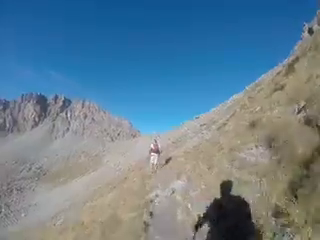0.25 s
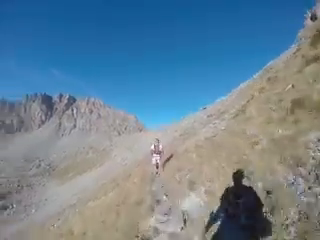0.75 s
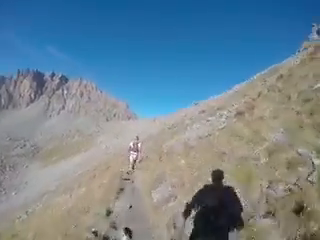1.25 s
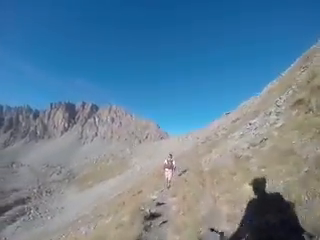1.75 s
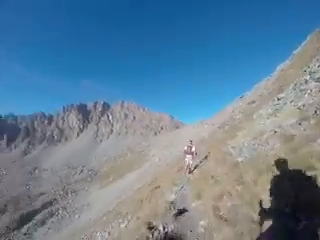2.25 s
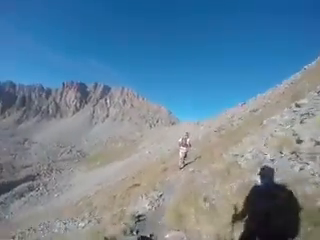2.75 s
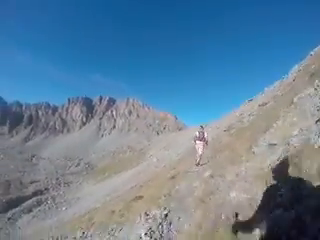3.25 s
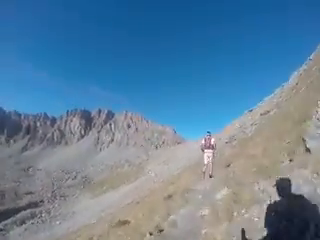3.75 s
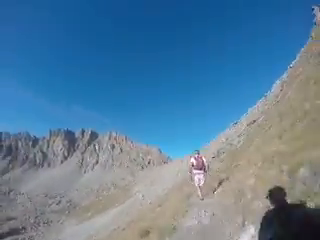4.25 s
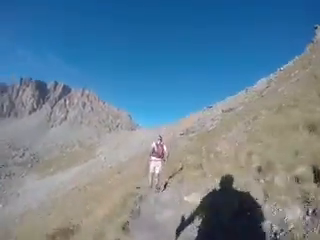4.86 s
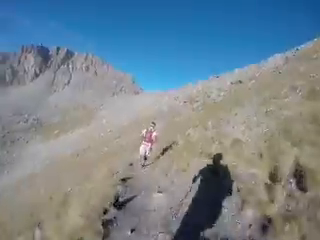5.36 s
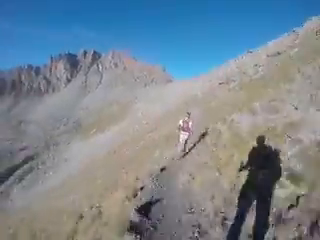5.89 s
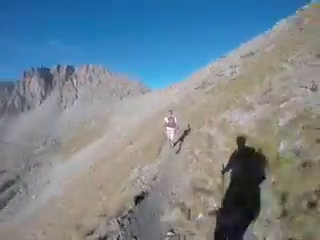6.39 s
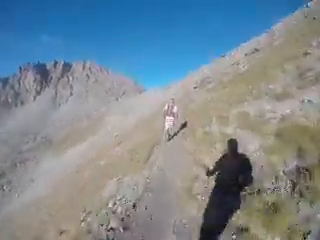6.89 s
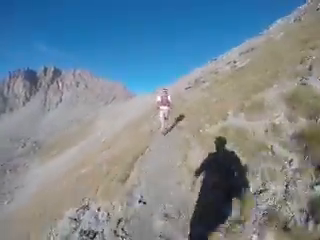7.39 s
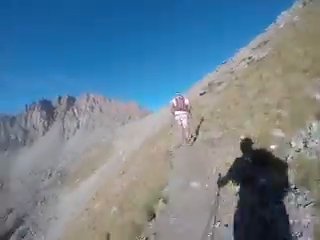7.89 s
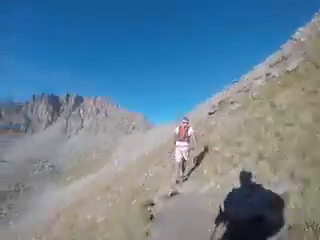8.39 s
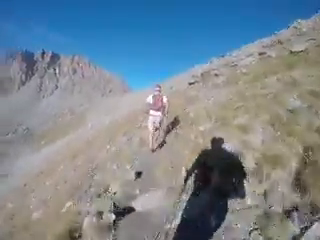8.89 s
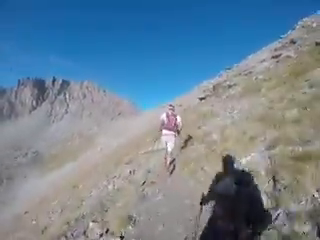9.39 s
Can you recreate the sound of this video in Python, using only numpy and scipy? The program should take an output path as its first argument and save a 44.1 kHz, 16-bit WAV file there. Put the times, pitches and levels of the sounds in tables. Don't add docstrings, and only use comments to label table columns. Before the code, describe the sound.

Close, boxy footsteps on a gravelly mountain path, with clicking poles, low wind puffs, hiss, faint animal whistles and one very loud plastic knock.

```python
import sys
import numpy as np
from scipy import signal
from scipy.fft import rfft, irfft, next_fast_len
from scipy.io import wavfile
from scipy.ndimage import uniform_filter1d, map_coordinates

SR = 44100
rng = np.random.default_rng(int(sys.argv[2]) if len(sys.argv) > 2 else 0)


def decibels_to_gain(level_db):
    exponent = np.asarray(level_db, float) / 20
    return 10 ** exponent


def transcribe(signal):
    frames = np.atleast_2d(signal).T
    limited = np.clip(frames, -1, 1)
    pcm = np.round(limited * 32767).astype(np.int16)
    wavfile.write(sys.argv[1], SR, pcm)


N = 425124
TOP_HZ = 15300

# pitch in Hz, width in Hz, level in dB.
CASE = [(1366, 110, -3), (1670, 160, 2.5), (2200, 400, 1), (2600, 310, 3), (3395, 220, -1)]
# pitch in Hz, width in Hz, level in dB.
PORT = [(5090, 540, -2), (5830, 550, -1.5), (9600, 2500, -16.5)]


def unit(x):
    return x / np.sqrt(np.mean(x ** 2) + 1e-20)


def wobble(rate):
    coarse = np.arange(0, N + 64, 64)
    knots = rng.standard_normal(int(N * rate / SR) + 4)
    smooth = map_coordinates(knots, [coarse * rate / SR])
    return np.interp(np.arange(N), coarse, smooth)


def swells(rows, rest_db):
    s, db, rise, fall = np.transpose(rows)[..., None]
    t = np.arange(0, N + 64, 64) / SR
    away = np.maximum((s - t) / np.maximum(rise, .01), (t - s) / np.maximum(fall, .01))
    power = (decibels_to_gain(db - 15 * away) ** 2).sum(0) + decibels_to_gain(rest_db) ** 2
    return np.interp(np.arange(N) / SR, t, 10 * np.log10(power))


def filtered(x, response):
    m = next_fast_len(N + 8192)
    return irfft(rfft(x, m) * response(np.fft.rfftfreq(m, 1 / SR)), m)[:N]


def noise(spectrum):
    hz, db = np.transpose(spectrum)

    def colour(f):
        return decibels_to_gain(np.interp(np.log(f + 1), np.log(hz), db, -120, -120))

    return unit(filtered(rng.standard_normal(N), colour))


def resonate(x, modes):
    return sum((-1) ** k * decibels_to_gain(db) * signal.lfilter(*signal.iirpeak(hz, hz / width, SR), x)
               for k, (hz, width, db) in enumerate(modes))


def electronics():
    # frequency in Hz, level in dB per Hz.
    hiss = [(120, -30.5), (200, 0.5), (1120, -6), (2680, -11.5), (4310, -14.5), (5890, -17.5),
            (7740, -23.5), (9640, -23), (11200, -28), (12200, -28), (13400, -31.5), (15200, -32),
            (15800, -59)]
    # pitch in Hz, level in dB rms.
    whine_tones = [(7101, -93), (9469, -83), (11838, -84.5), (13006, -102), (14207, -90)]
    t = np.arange(N) / SR
    whine = sum(decibels_to_gain(db + 3 + 1.3 * wobble(40)) * np.sin(2 * np.pi * hz * t) for hz, db in whine_tones)
    return decibels_to_gain(-62) * noise(hiss) + whine


def wind():
    # peak in seconds, level in dB.
    gusts = [(.08, -49.5), (.36, -47), (.72, -47.5), (1.06, -47), (1.28, -50), (1.48, -48), (1.86, -44.5),
             (2.23, -45), (2.62, -45.5), (2.98, -47.5), (3.42, -42.5), (3.68, -44), (3.95, -41.5),
             (4.12, -44.5), (4.32, -45.5), (4.65, -46.5), (5.0, -49.5), (5.36, -43.5), (5.65, -48.5),
             (6.16, -45), (6.53, -45.5), (6.85, -43.5), (7.12, -45), (7.41, -41), (7.74, -44), (8.06, -40),
             (8.36, -43), (8.74, -45.5), (9.04, -48), (9.43, -46)]
    # time in seconds, strength in dB.
    strength = [(0, -62.5), (1.2, -62), (2.3, -61), (3.1, -58.5), (3.5, -57.5), (3.9, -62.5), (4.24, -59.5),
                (4.67, -62.5), (5.1, -60), (5.8, -62), (6.55, -59), (7.1, -59.5), (7.6, -60.5),
                (8.1, -56.5), (8.56, -62), (9.25, -61), (9.64, -61.5)]
    # frequency in Hz, level in dB per Hz.
    buffet_spectrum = [(7.1, -32), (12, 7), (27, -0.5), (90, -17.5), (120, -41.5), (200, -120)]
    # frequency in Hz, level in dB per Hz.
    flutter_spectrum = [(40, -26.5), (70, 5), (200, -9.5), (400, -16.5), (900, -24), (2000, -45.5)]
    gust_s, lull_db = .2, -60
    buffet_db = swells([(s, db, gust_s, gust_s) for s, db in gusts], lull_db)
    flutter_db = np.interp(np.arange(N) / SR, *np.transpose(strength))

    buffet = noise(buffet_spectrum)
    recent_power = np.abs(uniform_filter1d(buffet ** 2, size=SR // 10))
    buffet = unit(buffet / np.sqrt(recent_power + .3))

    puffy_db = np.minimum(2.6 * wobble(25) + 2.6 * wobble(6), 4)
    flutter = unit(decibels_to_gain(puffy_db) * noise(flutter_spectrum))
    return decibels_to_gain(buffet_db + 0.2) * buffet + decibels_to_gain(flutter_db + 2.0) * flutter


def puffs():
    # start in seconds, peak in dB.
    strong = [(1.636, -46), (1.658, -43.5), (2.231, -45), (2.353, -45), (2.601, -44.5), (2.834, -41),
              (3.254, -46), (4.02, -45), (4.387, -45), (4.438, -45.5), (4.466, -46), (4.865, -45.5),
              (4.895, -46.5), (4.926, -40), (5.136, -45), (5.691, -42.5), (6.693, -43), (7.876, -43),
              (7.894, -42), (8.099, -39.5), (8.239, -41.5), (8.464, -43.5), (8.573, -46), (8.6, -41.5),
              (8.841, -42), (9.196, -46), (9.216, -41), (9.245, -41), (9.28, -43), (9.323, -40.5),
              (9.594, -46.5)]
    out, t = np.zeros(N + 400), np.arange(400) / SR
    stray = [(9.6 * when, -56 + 5 * size) for when, size in rng.random((20, 2))]
    for s, db in strong + stray:
        width_s = .0011 * decibels_to_gain(rng.normal(0, 2.0))
        out[round(s * SR):][:len(t)] -= decibels_to_gain(db + 5.5) * np.exp(-((t - .002) / width_s) ** 2)
    bass_cut = signal.butter(2, 55, "high", fs=SR, output="sos")
    return signal.sosfilt(bass_cut, out[:N])


def whistles():
    # start in seconds, length in seconds, start Hz, top Hz, end Hz, level in dB, roughness 0-1.
    calls = [
        (0.489, 0.105, 2200, 2700, 2640, -57, .9),
        (1.398, .062, 2150, 3170, 3000, -60, .5),
        (1.973, .065, 2300, 3250, 3050, -60, .5),
        (2.542, .065, 2400, 3300, 3050, -58, .5),
        (4.55, .045, 2550, 3300, 3250, -62, .3),
        (9.424, 0.056, 2950, 3330, 3080, -58, .15),
    ]
    out, waver, flicker = np.zeros(N), wobble(160), wobble(350)
    for s, length, start_hz, top_hz, end_hz, db, rough in calls:
        u = np.arange(round(length * SR)) / (length * SR)
        here = slice(round(s * SR), round(s * SR) + len(u))
        rise = (top_hz - start_hz) * np.clip(1 - u / 0.45, 0, 1) ** 1.9
        fall = (top_hz - end_hz) * np.clip((u - .5) / .5, 0, 1) ** 2.2
        quaver, flutter = rough * waver[here], rough * flicker[here]
        swell = np.sin(np.pi * u ** 0.85) ** 0.45 * (1 - .3 * rough + .55 * flutter)
        turn = 2 * np.pi * np.cumsum(top_hz - rise - fall + 40 * quaver) / SR
        tone = np.sin(turn) + decibels_to_gain(-13) * rough * np.sin(1.86 * turn)
        out[here] += decibels_to_gain(db + 1.0) * swell * tone
    return out


def grit(per_second, spread_db, rub):
    when, side, size = rng.random((3, int(per_second * N / SR)))
    size_db = spread_db * np.minimum(-np.log(size), 3)
    breaks = np.bincount((when * N).astype(int), np.sign(side - .5) * decibels_to_gain(size_db), N)
    return unit(breaks) + rub * np.sqrt(12) * (rng.random(N) - .5)


def crunch(modes, per_second, clumps_db, own_db):
    shared = resonate(grit(per_second, spread_db=2.8, rub=.5), modes)
    own = 0
    for mode in modes:
        grains = grit(per_second / 4, spread_db=3.2, rub=.45)
        own = own + decibels_to_gain(own_db * wobble(40)) * resonate(grains, [mode])
    return unit(decibels_to_gain(clumps_db) * (.7 * shared + 1.3 * own))


def boots():
    # full weight in seconds, crunch in dB, roll-on in seconds, roll-off in seconds.
    steps = [(.048, -60.5, 0.13, 0.2), (.4, -56.5, .16, 0.093), (.748, -51.5, 0.076, 0.085),
             (1.108, -55, 0.14, 0.075), (1.428, -58.5, 0.15, 0.29), (1.872, -58, .18, .1),
             (2.218, -55, 0.18, 0.23), (2.592, -59, 0.19, .45), (3.008, -52, .08, 0.083),
             (3.3, -51.5, .03, 0.19), (3.702, -56, .25, 0.24), (4.028, -49.5, 0.094, 0.09),
             (4.3, -52, 0.14, 0.31), (4.678, -53, 0.064, .17), (5.09, -55, 0.16, 0.22),
             (5.412, -54, 0.31, 0.063), (5.788, -57.5, 0.25, 0.27), (6.148, -54, 0.12, 0.16),
             (6.562, -53, .17, .19), (6.84, -52, 0.091, 0.16), (7.088, -54.5, 0.17, 0.2),
             (7.428, -53, .4, 0.19), (7.76, -53.5, 0.21, 0.15), (8.062, -52, 0.16, .2),
             (8.41, -52, 0.073, .22), (8.86, -59, 0.2, 0.12), (9.148, -57, 0.31, 0.31),
             (9.552, -54.5, .18, .12)]
    # time in seconds, crunch in dB, brightness in dB.
    scuffs = [(.3, -63, 5), (.39, -65, 7), (.558, -57, -1), (.8, -66, 9), (.918, -63, 3), (1.248, -62, 3),
              (1.668, -61, 0), (1.85, -64, 7), (2.002, -64, 3), (2.6, -64, 8), (3.16, -62, 0),
              (4.128, -63, 5), (4.26, -61, 7), (4.47, -63.5, 9), (4.598, -55, -8), (4.908, -63, 0),
              (5.558, -62, 3), (6.54, -61, 7), (6.798, -56, 4), (7.53, -59.5, 3), (7.658, -54, 2.5),
              (7.95, -55, 3), (8.1, -60, 9), (8.19, -54.5, 2), (8.29, -55.5, -8), (8.4, -60, 7),
              (8.66, -58, 0), (8.76, -56, 3), (9.062, -65, -2), (9.398, -58, -2)]
    on_s, off_s, bed_db = .07, .08, -73
    fine_grows = 0.64
    dull_scuffs = [(s, db, on_s, off_s) for s, db, _ in scuffs]
    bright_scuffs = [(s, db + more / fine_grows, on_s, off_s) for s, db, more in scuffs]
    crunch_db = swells(steps + dull_scuffs, bed_db)
    bright_db = swells(steps + bright_scuffs, bed_db)
    fine_db = -71.5 + fine_grows * (bright_db + 60)

    clumps = wobble(50)
    fine_clumps = .8 * clumps + 1.7 * wobble(30) + 1.6 * wobble(14)
    coarse = crunch(CASE, 600, clumps, own_db=2.2)
    fine = crunch(PORT, 900, fine_clumps, own_db=2.5)
    muffle = signal.butter(1, 9000, fs=SR, output="sos")
    return signal.sosfilt(muffle, decibels_to_gain(crunch_db - .3) * coarse + decibels_to_gain(fine_db + 2.5) * fine)


def ticks():
    # start in seconds, peak in dB, pitch in Hz, thud against peak in dB.
    tips = [(.3212, -37, 1650, -25), (.615, -39, 2080, -11), (.7332, -33, 2600, -29),
            (1.1098, -40, 1910, -13), (1.239, -38.5, 2520, -23), (1.8861, -38, 2330, -26),
            (2.5361, -38, 1620, -18), (3.9993, -34, 2230, -22), (4.2487, -33, 2330, -22),
            (4.2881, -32.5, 2510, -24), (4.5904, -41, 2500, -20), (4.6423, -34, 1750, -22),
            (4.6817, -34.5, 2100, -25), (4.8947, -36.5, 1580, -22), (5.2764, -37, 1680, -11),
            (5.3297, -35.5, 1620, -24), (5.3831, -33, 1650, -32), (5.6686, -34.5, 1440, -23),
            (6.4592, -40.5, 2590, -9), (6.4761, -32.5, 1610, -12), (6.772, -30, 1560, -11),
            (7.3442, -27, 1740, -26), (7.648, -39.5, 1630, -24), (7.9792, -40, 2300, -8),
            (8.0471, -38, 3260, -16), (8.3773, -38, 2520, -20), (9.0004, -38, 1430, -18),
            (9.3718, -40, 1650, -15), (9.5112, -34.5, 1760, -27), (9.5351, -35, 2490, -24)]
    # start in seconds, peak in dB, pitch in Hz.
    rebounds = [(.3235, -41, 1350), (.6185, -40, 1370), (6.7758, -33, 1550), (6.7784, -32, 1640),
                (7.3444, -29, 1200), (7.3476, -36, 1600), (7.3502, -35, 2350)]
    # start in seconds, peak in dB, pitch in Hz.
    turning = [(.0608, -41, 2640), (.7188, -41, 1550), (0.621, -38.5, 2700), (1.3818, -40, 1650),
               (1.4561, -40.5, 2980), (1.7724, -39.5, 2360), (1.7908, -43, 1370), (1.8607, -38, 2320),
               (1.9145, -38, 2670), (2.3106, -41.5, 2480), (2.5107, -38.5, 2400), (3.055, -42, 2800),
               (3.329, -50, 2270), (3.345, -54, 2100), (3.371, -53, 2100), (5.2533, -43, 2610),
               (4.8821, -44, 1400), (1.2218, -48, 3370), (3.6945, -44.5, 2670), (4.0267, -38, 2380),
               (4.6603, -35.5, 2290), (5.0474, -42, 2520), (5.4984, -42.5, 1700), (5.7423, -39, 2460),
               (6.5285, -43, 1670), (6.5415, -37, 3200), (6.8293, -39, 1660), (7.1311, -42, 2610),
               (7.626, -39, 2630), (7.7253, -41, 1720), (8.1364, -43, 2060), (8.2641, -40.5, 2320),
               (8.6547, -40.5, 2780), (9.4848, -39, 2240), (9.5482, -36, 2760), (.3017, -45, 1720),
               (.7345, -37, 3350), (1.0884, -44, 2270), (1.8753, -42, 2170), (1.3745, -44, 3350),
               (6.779, -40, 2550), (6.79, -42, 2700), (4.743, -45, 3400), (2.497, -45, 2500),
               (4.3119, -42, 1700), (4.3204, -40, 3200), (4.6297, -42, 1660), (5.6489, -44, 1630),
               (6.8335, -42, 2300), (6.8435, -42, 3300), (7.4235, -41, 2700), (7.428, -43, 1700),
               (8.0249, -43, 2230), (8.274, -43, 2500)]
    # start in seconds, peak in dB, pitch in Hz.
    grains = [(0.3894, -46, 1930), (0.3994, -44, 2570), (0.4074, -45, 1710), (0.4349, -44, 2360),
              (0.4554, -49, 1610), (0.7564, -43, 2500), (0.7644, -40, 2680), (1.0036, -49, 2350),
              (3.9444, -46, 1680), (3.9744, -44, 2300), (4.0534, -39, 1700), (4.2178, -41, 2480),
              (4.347, -40, 2620), (4.4293, -43, 1740), (4.4962, -45, 2820), (4.5814, -44, 2520),
              (4.597, -40, 1710), (4.7244, -45, 2070), (6.5051, -44, 2610), (6.5779, -40, 2690),
              (6.6298, -45, 2740), (6.7014, -48, 2820), (6.8514, -40, 2150), (6.8633, -39, 1680),
              (6.8972, -46, 2640), (7.0314, -45, 1700), (7.0524, -44, 2690), (7.0744, -43, 2650),
              (7.2544, -46, 2430), (7.3163, -45, 1650), (7.4064, -44, 1330), (7.4124, -42, 2370),
              (7.419, -41, 2630), (7.4614, -45, 2710), (7.4874, -45, 1590), (7.6101, -39, 2530),
              (7.7473, -40, 2530), (7.9309, -44, 2650), (8.0686, -42, 1620), (8.0954, -42, 2380),
              (8.1599, -41, 2920), (8.1978, -45, 2720), (8.297, -42, 1400), (8.3978, -41, 2410),
              (8.4104, -41, 2520), (8.4402, -40, 3330), (8.4771, -41, 2630), (8.517, -44, 1680),
              (8.7256, -42, 1680), (8.7415, -41, 1720), (8.7625, -42, 2030), (8.8159, -45, 2710),
              (9.178, -43, 2310)]
    # start in seconds, peak in dB, pitch in Hz.
    pebbles = [(0.0283, -48, 2450), (1.514, -46, 2450), (2.0792, -49, 1690), (2.1201, -48, 1700),
               (2.1834, -46, 2340), (2.1949, -44, 2490), (2.2079, -41, 1630), (2.6818, -48, 2580),
               (3.0824, -51, 2770), (3.5957, -56, 2580), (3.6461, -51, 1630), (3.7733, -53, 2230),
               (4.8219, -49, 3380), (5.0115, -44, 2690), (5.3527, -46, 2210), (5.5343, -48, 2400),
               (5.8321, -48, 1690), (5.9569, -47, 2740), (6.1225, -46, 2440), (6.1324, -44, 2450),
               (6.1454, -45, 2630), (6.2332, -48, 2250), (8.97, -49, 2240), (9.0844, -49, 2430),
               (9.1052, -44, 2680), (9.1272, -40, 2610), (9.3102, -49, 2090), (9.3382, -49, 2570),
               (9.3811, -44, 1650), (9.5956, -44, 2570)]
    # start in seconds, peak in dB, pitch in Hz.
    bright_chips = [(0.617, -42, 5120), (.6235, -43, 5600), (.7203, -46, 5220), (.8934, -46, 5860),
                    (1.3728, -44, 5300), (1.7699, -44, 5230), (2.3181, -45, 5850), (3.33, -58, 5800),
                    (3.345, -57, 5900), (3.998, -45, 6020), (4.5906, -38, 4930), (5.0117, -39, 5100),
                    (5.957, -45, 4970), (6.5257, -46, 5300), (6.6659, -43, 5170), (7.387, -36, 5630),
                    (7.5449, -43, 5670), (7.73, -47, 5810), (7.94, -44, 5700), (8.1361, -44, 4500),
                    (8.165, -46, 5210), (8.4673, -48, 5570), (8.9392, -50, 5540), (9.51, -48, 5500)]
    # start in seconds, peak in dB, pitch in Hz.
    more_chips = [(0.2788, -55, 5210), (0.387, -52, 5870), (0.4, -49, 6060), (1.4057, -51, 5220),
                  (1.8477, -50, 5140), (2.58, -53, 5680), (2.6165, -50, 6330), (4.0961, -52, 5840),
                  (4.2567, -51, 4860), (4.4298, -50, 5760), (4.4717, -48, 5060), (5.254, -53, 5170),
                  (5.7862, -51, 6060), (5.8466, -50, 5550), (6.5435, -47, 4940), (6.8024, -47, 5190),
                  (6.997, -51, 5530), (7.0334, -51, 5570), (7.3178, -50, 5180), (7.3564, -48, 5550),
                  (7.4135, -50, 5190), (7.6106, -50, 5060), (8.0361, -47, 5180), (8.093, -45, 5980),
                  (8.3988, -50, 5570), (9.4938, -51, 5460), (9.5986, -52, 5640)]
    # pitch in Hz, width in Hz, level in dB.
    ground = [(594, 350, 1.5), (1200, 550, 3.5)]
    stone_t60_s, chip_t60_s = .012, .0073
    jar = .05

    poles = [(s, db, hz, .012 + .0008 * (db + 36), thud_db) for s, db, hz, thud_db in tips]
    stones = [(*row, stone_t60_s, -21) for row in turning + rebounds + grains + pebbles]
    chips = bright_chips + [(s, db + 4, hz) for s, db, hz in more_chips]
    chips = [(*row, chip_t60_s, -40) for row in chips]

    (ring, shock, thud), t = np.zeros((3, N + 1200)), np.arange(1200) / SR
    for s, db, hz, t60, thud_db in poles + stones + chips:
        here = slice(round(s * SR), round(s * SR) + len(t))
        fall = decibels_to_gain(db - 60 * t / np.clip(t60, .003, .05)) * (1 - np.exp(-t / 0.00042))
        signs = np.sign(rng.standard_normal(len(t)))
        ring[here] += fall * np.sin(2 * np.pi * hz * t + jar * np.cumsum(signs))
        shock[here] += fall * signs
        thud[here] += decibels_to_gain(thud_db) * fall * signs
    air = decibels_to_gain(6.5) * resonate(shock[:N], CASE) + decibels_to_gain(-8) * resonate(shock[:N], PORT[:2])
    return decibels_to_gain(2.0) * ring[:N] + air + decibels_to_gain(17.0) * resonate(thud[:N], ground)


def rings(modes, k, pitch, t):
    return sum(decibels_to_gain(row[2 + k] - 60 * t / row[1]) * np.sin(2 * np.pi * row[pitch] * t) for row in modes)


def knocks():
    # start in seconds, peak in dB, contact in seconds, body thump in dB, thump Hz, hardness Hz.
    blows = [
        (2.9832, -25, 0.0028, -26, 90, 3500),
        (3.1948, -.6, .0028, -31, 72, 15000),
        (3.271, -13.5, .003, -25.5, 62, 5000),
    ]
    swing_db = [-9, -16, -7]
    # pitch in Hz, t60 in seconds, dB in knocks 1, 2 and 3, Hz in the softer knocks.
    shell = [(321, .014, -7, -15, -23, 304), (609, .018, -2, -11, -19, 594), (818, .014, -2, -10, -18, 824),
             (1590, .03, -13, -8, -21, 1470), (1921, .03, -14, -13, -18, 1800),
             (2303, .034, -12, -2, -20, 2285), (2984, .02, -22, -14, -25, 2945),
             (3486, .015, -35, -18, -28, 3482), (4448, .01, -24, -8, -31, 4454),
             (5389, .01, -34, -10, -40, 5100), (5949, .01, -30, -8, -40, 5400),
             (6948, .005, -40, -10, -34, 6900), (8188, .003, -35, -11, -45, 7900),
             (11171, .003, -45, -14, -45, 10000)]
    # pitch in Hz, t60 in seconds, dB in knocks 1, 2 and 3.
    after = [(610, .04, -36, -38, -27), (1626, .04, -36, -38, -32), (1820, .12, -40, -54, -33),
             (2480, .07, -42, -44, -44), (2762, .064, -38, -37, -38)]
    out, t = np.zeros(N), np.arange(SR // 8) / SR
    for k, (s, db, contact_s, thump_db, thump_hz, hard_hz) in enumerate(blows):
        hardest = k == 1
        onset = 1 - np.exp(-t / 0.00021)
        late = t - contact_s
        damping_db = -20 * np.clip(late / 0.0008, 0, 1) - 60 * np.maximum(late, 0) / .05
        blow = rings(shell, k, 0 if hardest else -1, t) * onset * decibels_to_gain(damping_db)
        blow = blow / np.abs(blow).max()
        rattle = decibels_to_gain(-23 - 60 * t / .05) * rng.standard_normal(len(t))
        crack = decibels_to_gain(-22 - 60 * t / (2.5 * contact_s)) * rng.standard_normal(len(t))
        blow = blow + crack + rattle * (not hardest) + onset * rings(after, k, 0, t)
        soft = signal.butter(4, min(hard_hz, 20000), fs=SR, output="sos")
        blow = signal.sosfilt(soft, blow)

        cycles = thump_hz * t + .42 * (1 - np.exp(-t / .0021))
        thump_level = decibels_to_gain(thump_db - 60 * t / .03) + decibels_to_gain(thump_db + swing_db[k] - 60 * t / .14)
        thump = thump_level * np.sin(2 * np.pi * cycles)
        out[round(s * SR):][:len(t)] += decibels_to_gain(db) * blow + thump
    return signal.sosfilt(signal.butter(8, 15200, fs=SR, output="sos"), out)


def gain_control():
    duck_s, duck_db, hold_s, recover_s = 3.177, -13.5, .2, 0.62
    since = np.arange(N) / SR - duck_s
    recovery = np.clip((since - hold_s) / recover_s, 0, 1)
    return decibels_to_gain(duck_db * np.clip(since / .003, 0, 1) * (1 - recovery))


def scene():
    on_case = knocks()
    steady = gain_control() * (boots() + electronics() + wind() + puffs())
    dull = signal.butter(2, 7500, fs=SR, output="sos")
    around = steady + signal.sosfilt(dull, ticks()) + whistles()
    return (on_case + filtered(around, lambda hz: hz < TOP_HZ))[None]


def sparse_top(x):
    # start in seconds, length in seconds.
    dropouts = [(.72, .02), (1.232, .015), (1.898, .036), (2.495, .04), (2.964, .036), (3.988, .02),
                (4.28, .015), (5.268, .015), (5.335, .055), (5.652, .031), (6.47, .015), (7.335, .015),
                (8.365, .032)]
    sparse_hz, keep_db = 12750, 2.2
    hz, t, z = signal.stft(x, SR, nperseg=1024)
    top = z[:, hz > sparse_hz]
    usual = np.median(np.abs(z[:, (hz > sparse_hz) & (hz < TOP_HZ)]))
    strong = uniform_filter1d(np.abs(top), size=3, axis=1) > usual * decibels_to_gain(keep_db)
    given_up = sum((t > s) & (t < s + length) for s, length in dropouts) > 0
    z[:, hz > sparse_hz] = top * strong * ~given_up
    return signal.istft(z, SR, nperseg=1024)[1][:, :N]


def low_pass(x):
    return signal.sosfilt(signal.butter(12, 16230, fs=SR, output="sos"), x)


def record(dry):
    clipped = np.clip(sparse_top(dry), -1, 1)
    return low_pass(clipped)


dry = scene()
out = record(dry)
transcribe(out)
```